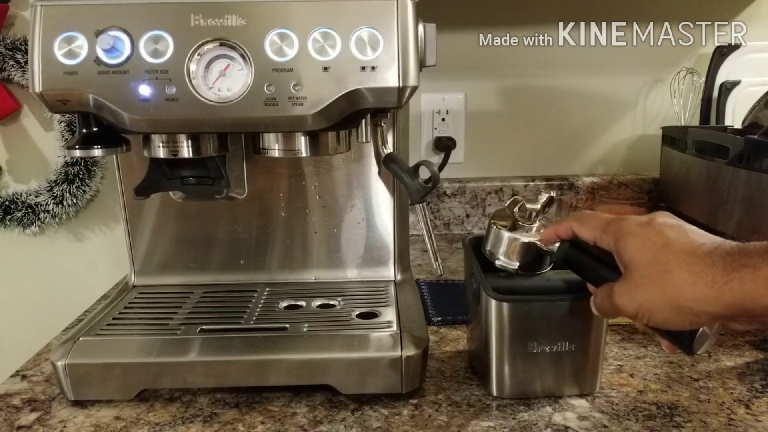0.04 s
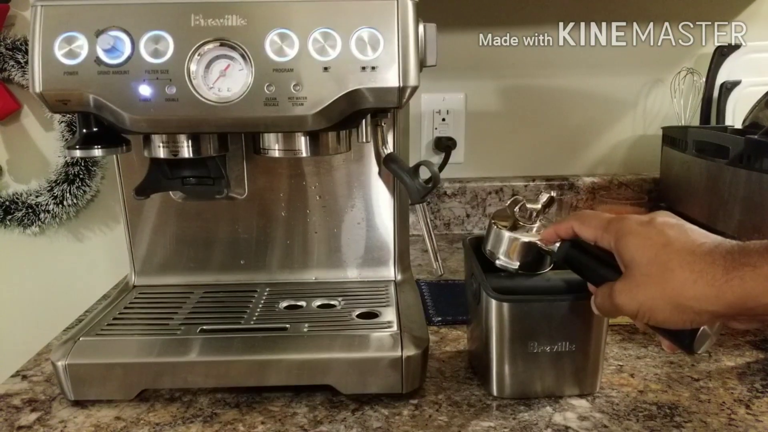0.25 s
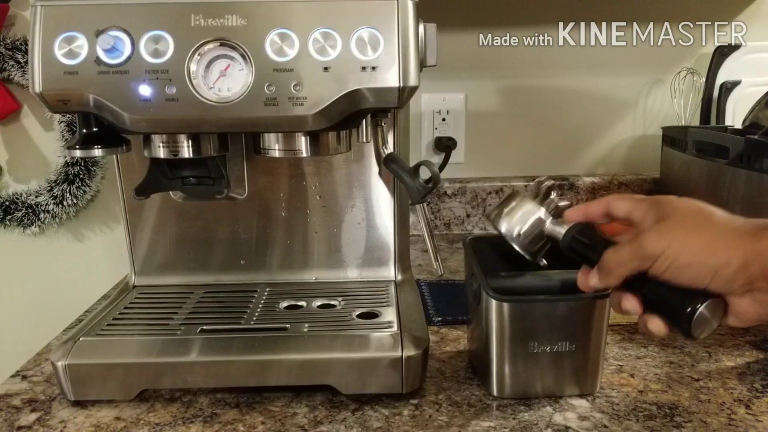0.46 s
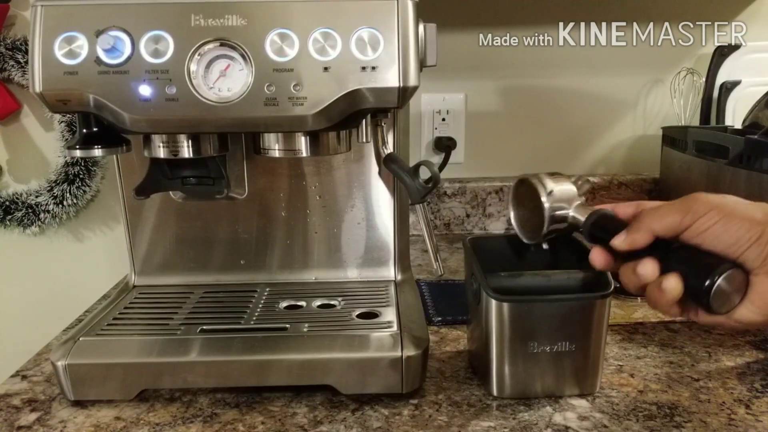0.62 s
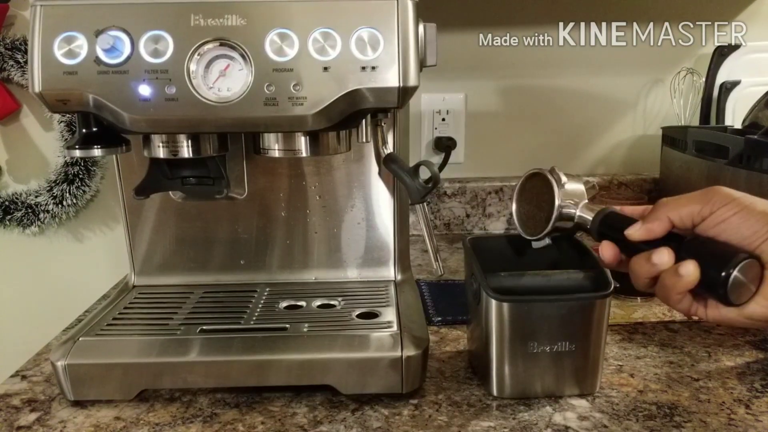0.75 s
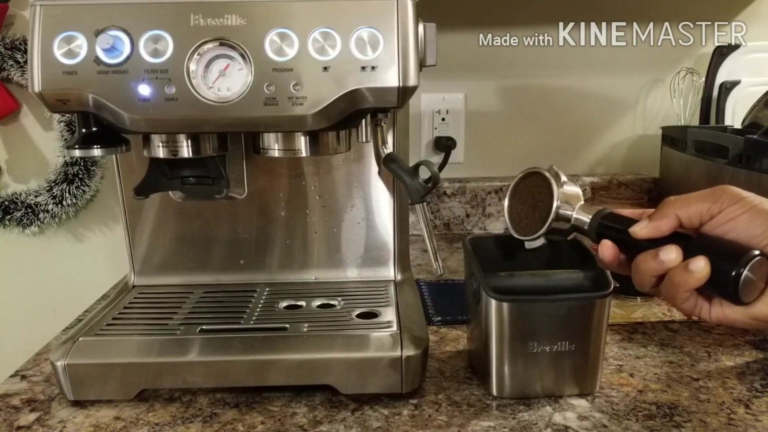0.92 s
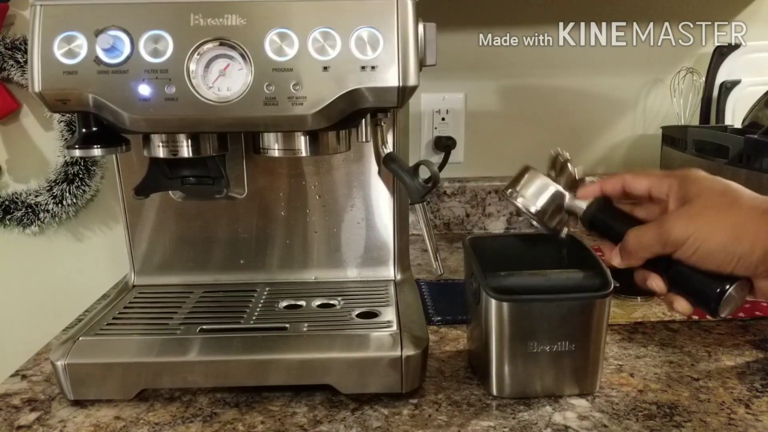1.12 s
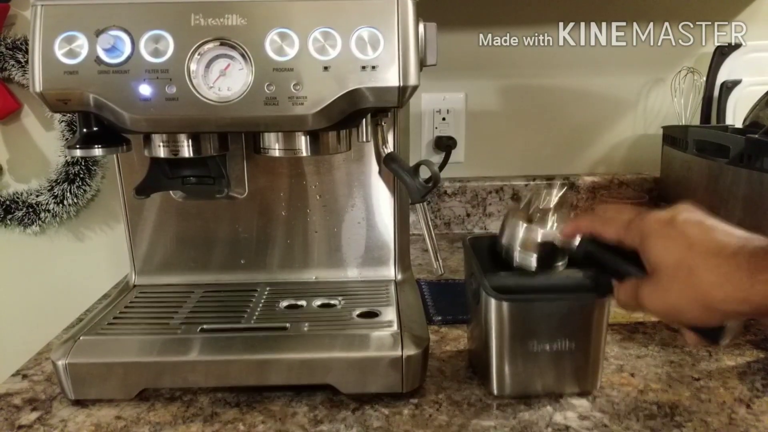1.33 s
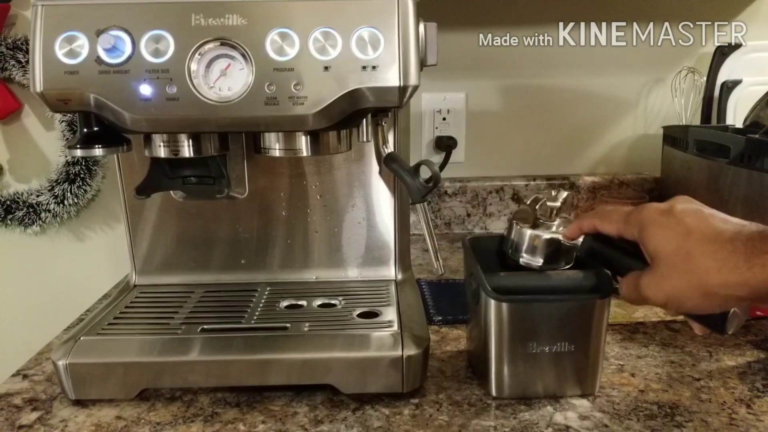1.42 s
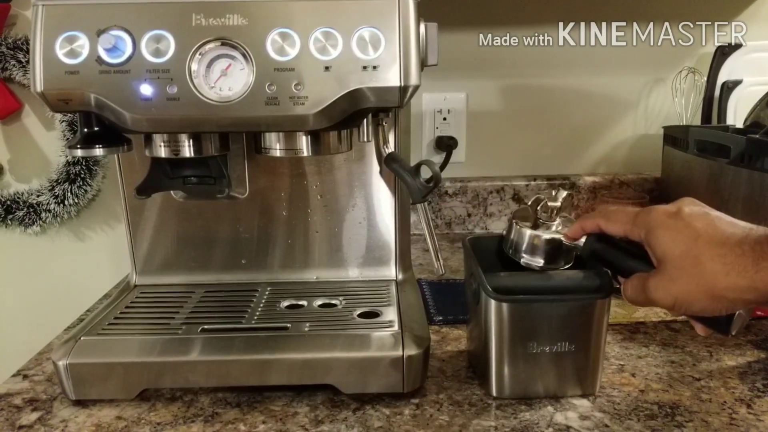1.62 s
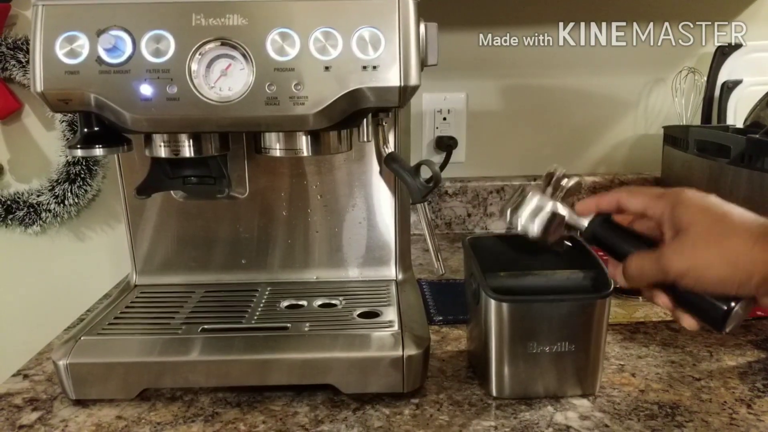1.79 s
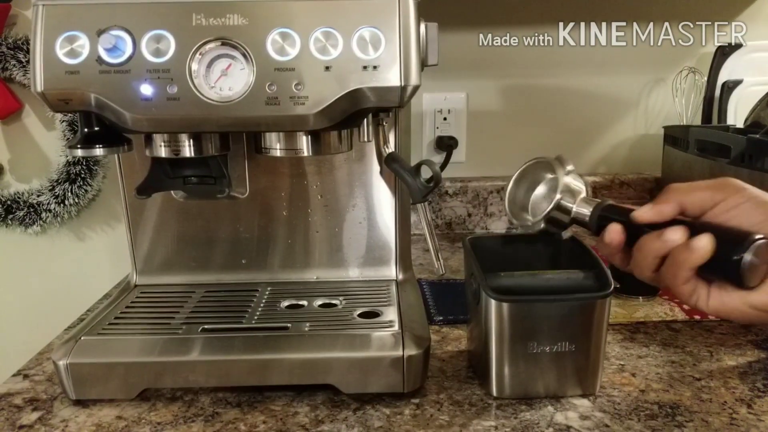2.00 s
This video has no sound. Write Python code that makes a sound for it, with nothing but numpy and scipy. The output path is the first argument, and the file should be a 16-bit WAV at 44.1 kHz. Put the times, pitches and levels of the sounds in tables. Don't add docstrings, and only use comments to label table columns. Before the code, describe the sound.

Coffee filter holder banged hard against a knock box's rubber bar: a low boxy thump with brief steel ring and short kitchen echo, then light settling bounces over faint mains hum, picked up close.

```python
import sys
import numpy as np
from scipy import signal
from scipy.io import wavfile
from scipy.ndimage import uniform_filter1d, minimum_filter1d

SR = 44100
rng = np.random.default_rng(int(sys.argv[2]) if len(sys.argv) > 2 else 0)


def wrap_up_sound(samples):
    columns = np.atleast_2d(samples).T
    tamed = np.clip(columns, -1, 1)
    steps = np.round(tamed * 32767).astype(np.int16)
    wavfile.write(sys.argv[1], SR, steps)


def volts_from_db(level):
    exponent = np.asarray(level, float) / 20
    return 10 ** exponent


N = 90449


def read(points, hz):
    f, value = np.transpose(points)
    return np.interp(np.log(hz + 1), np.log(f + 1), value)


def evened(x):
    return x / np.sqrt(np.mean(x ** 2) + 1e-20)


def add(mix, s, sound):
    at = round(s * SR)
    sound = sound[max(-at, 0):]
    part = mix[max(at, 0):][:len(sound)]
    part += sound[:len(part)]


def clock(seconds):
    return np.arange(0, seconds, 1 / SR)


def onset(t, rise_s):
    return 1 - np.exp(-t / rise_s)


def ring(modes, t, scatter=0):
    spread_db = -1.5
    hz, db, t60 = np.transpose(modes)[:, :, None]
    more, turn = rng.standard_normal((2, len(modes), 1))
    level = volts_from_db(db + spread_db * scatter * more - 60 * t / t60)
    sines = level * np.sin(2 * np.pi * (hz * t + scatter * turn))
    return sines.sum(0) / np.sqrt(len(modes))


def coloured(t, colour, decays):
    hz, at, z = signal.stft(rng.standard_normal(len(t)), SR, nperseg=512, noverlap=448)
    z = z * volts_from_db(read(colour, hz)[:, None] - 60 * at / read(decays, hz)[:, None])
    tail = signal.istft(z, SR, nperseg=512, noverlap=448)[1][:len(t)]
    return tail / np.sqrt(np.mean(tail[:len(t) // 20] ** 2))


def steady(shape):
    a, b = rng.standard_normal((2, len(shape), N // 512 + 5))
    return evened(signal.istft((a + 1j * b) * shape[:, None], nperseg=2048, noverlap=1536)[1][:N])


# f/Hz, level/dB
AIR_COLOUR = [(28, -13.5), (50, 1.5), (200, -7), (600, -15), (1200, -26.5), (2200, -41.5), (10000, -38.5),
              (15000, -54.5)]
# f/Hz, width/Hz, level/dB
WHINES = [(2798, 200, -90), (3440, 440, -82.5), (7030, 900, -79)]


def air():
    hz = np.fft.rfftfreq(2048, 1 / SR)
    wide = steady(volts_from_db(read(AIR_COLOUR, hz)))
    thin = steady(sum(volts_from_db(db) / np.sqrt(w) * np.exp(-((hz - f) / w) ** 2) for f, w, db in WHINES))
    whine_level = np.sqrt(sum(volts_from_db(db) ** 2 for f, w, db in WHINES))
    return volts_from_db(-53) * wide + whine_level * thin


# multiple of the mains frequency, level/dB
HUM = [(1, -62), (2, -56), (3, -61), (4, -68.5), (5, -60.5), (6, -60), (7, -68.5), (8, -65), (9, -63.5),
       (10, -65), (17, -98), (21, -86), (25, -85)]


def hum():
    mains_hz, waver_db = 60, 2.5
    t, out = np.arange(N) / SR, np.zeros(N)
    for k, db in HUM:
        turn = rng.random(7)
        sways = zip(np.geomspace(.7, 16, 6), turn)
        waver = sum(np.sin(2 * np.pi * (f * t + p)) for f, p in sways) / np.sqrt(3)
        tone = np.sin(2 * np.pi * (round(k) * mains_hz * t + turn[6]))
        out += np.sqrt(2) * volts_from_db(db + waver_db * waver) * tone
    return out


# f/Hz, level/dB
EARLIER_COLOUR = [(25, -8), (90, 0.5), (150, 4.5), (400, -4.5), (1100, -13.5), (2300, -28), (4600, -34.5),
                  (15400, -49)]
# f/Hz, t60/s
EARLIER_DECAY = [(80, 0.45), (400, 0.3), (1100, 0.4), (2300, 0.49), (4200, 0.39), (7000, 0.26),
                 (14000, 0.13)]
# f/Hz, level/dB, t60/s
EARLIER_RING = [(48.16, -21, 0.48), (83.3, -5, .2), (145.9, -10.5, 0.22), (300.7, -26.5, 0.57),
                (635, -24, 0.35), (1150, -37, 0.24), (2060, -39, .4)]


def earlier():
    t = clock(.6)
    echo = volts_from_db(-24.5) * coloured(t, EARLIER_COLOUR, EARLIER_DECAY)
    return -.05, echo + ring(EARLIER_RING, t)


# t/s, bounce level/dB, click level/dB, tick level/dB
TOUCHES = [
    (1.5955, -37.5, -46, -42.5),
    (1.603, -16, -46.5, -44.5),
    (1.8684, -47, -51, -58),
    (1.8746, -25.5, -60, -58),
    (1.8775, -58, -43.5, -65.5),
    (1.8827, -31, -56, -72),
    (1.903, -48, -55.5, -72),
]
# f/Hz, level/dB, t60/s
BOUNCE = [(118.5, -7.5, .4), (136.2, -2.5, 0.22), (154.3, -1, 0.22), (697.6, -18, 0.095), (835, -15, 0.071)]
# f/Hz, level/dB
CLICK = [(300, -10), (900, -14), (1300, 2.5), (1900, -3), (2700, -9.5), (4000, -24), (8000, -26.5),
         (15400, -42)]
# f/Hz, level/dB
TICK = [(200, -21.5), (1000, -7), (2500, -5.5), (5000, -6), (10000, -10.5), (15000, -18.5), (16000, -42)]
# f/Hz, t60/s
KITCHEN = [(80, .6), (250, 0.34), (700, 0.39), (1500, 0.36), (3000, 0.37), (7000, 0.37), (14000, .22)]


def touch(s, bounce_db, click_db, tick_db):
    t = clock(.4)
    rock = ring(BOUNCE, t) * onset(t, 0.0011)
    room_db = -15
    click = coloured(t, CLICK, KITCHEN) * (np.exp(-t / 0.0042) + volts_from_db(room_db))
    tick = coloured(t, TICK, KITCHEN) * np.exp(-t / 0.0035)
    contact = (volts_from_db(click_db) * click + volts_from_db(tick_db) * tick) * onset(t, 0.00055)
    return s, volts_from_db(bounce_db) * rock + contact


# f/Hz, level/dB, t60/s
LANDING = [(199.3, 2.5, 0.16), (626, -6.5, 0.17), (824, -14, 0.18)]


def landing():
    t = clock(.4)
    return 1.425, volts_from_db(3) * ring(LANDING, t) * onset(t, 0.015)


# f/Hz, level/dB, t60/s
BAR = [(349.6, 1, 0.16), (546.5, -5, 0.19), (648, -0.5, 0.24), (866, -7.5, 0.13), (1224, -10, 0.053),
       (2690, -19, 0.0083), (4435, -14, .015)]


def bar():
    t = clock(.4)
    return KNOCKS[0][0], volts_from_db(8.5) * ring(BAR, t) * onset(t, 0.00044)


# t/s, then thump, box, echo field and tick, each level/dB
KNOCKS = [
    (1.3864, 1, 2.5, 6, 0.5),
    (1.409, 1.5, -3.5, 4.5, -6.5),
    (1.428, -2, 4, 3, -18.5),
]
# f/Hz, level/dB, t60/s
THUMP = [(101.7, -12, 0.38), (120.9, -14.5, 0.44), (136.3, 3.5, 0.25), (166.45, -4, 0.37), (207, -7, 0.24)]
# f/Hz, level/dB, t60/s
BOX = [(242, -3, 0.083), (302, -8, .35), (332.9, 1, 0.45), (382.6, -4, .24), (437.6, -11, 0.49),
       (497.4, -7, 0.34), (547, -0.5, 0.15), (616.5, -5.5, 0.19), (643, 7, 0.16), (677, -24.5, 0.22),
       (770, -15, 0.12), (924, -15.5, .15), (1046, -19.5, 0.14)]
# f/Hz, level/dB, t60/s
STEEL = [(1520, -3.5, 0.045), (2667, -4, 0.076), (3036, -9, 0.13), (4380, -1.5, 0.01), (8650, -14, 0.045),
         (10450, -17.5, .22), (10600, -17.5, 0.36), (12300, -21.5, .05)]
# f/Hz, level/dB
FIELD = [(62, -35.5), (150, -1), (650, -5), (1000, -15.5), (4400, -34), (5600, -39), (11000, -43.5),
         (15400, -59)]


def knock(s, thump_db, box_db, field_db, tick_db):
    t = clock(.8)
    thump = ring(THUMP, t) * onset(t, 0.0034)
    box = ring(BOX, t, scatter=0.97) * onset(t, 0.003)
    field = volts_from_db(-9.5) * coloured(t, FIELD, KITCHEN) * onset(t, 0.0024)
    tick = volts_from_db(-19.5) * coloured(t, TICK, KITCHEN) * np.exp(-t / .0015)
    steel = volts_from_db(-13.5) * ring(STEEL, t, scatter=1)
    tick = (tick + steel) * onset(t, 0.00018)
    body = volts_from_db(thump_db) * thump + volts_from_db(box_db) * box
    return s, body + volts_from_db(field_db) * field + volts_from_db(tick_db) * tick


def scene():
    mix = air() + hum()
    add(mix, *earlier())
    for row in TOUCHES:
        add(mix, *touch(*row))
    add(mix, *landing())
    add(mix, *bar())
    for row in KNOCKS:
        add(mix, *knock(*row))
    return mix[None]


def held(over_db, db_per_s):
    fall = np.arange(N) * db_per_s / SR
    return np.maximum(np.maximum.accumulate(over_db + fall) - fall, 0)


def gain_control(x):
    from_db, share, rise_s, recover_db_per_s = -26.5, 0.29, 0.097, 2.5
    rise = round(rise_s * SR)
    power_db = 10 * np.log10(abs(uniform_filter1d(x ** 2, size=1000)) + 1e-12)
    duck_db = share * held(power_db - from_db, recover_db_per_s / share)
    return x / volts_from_db(uniform_filter1d(duck_db, rise, origin=rise // 2 - 1))


def limiter(x):
    ceiling, hold_s, release_db_per_s = .99, .003, 400
    hold = round(hold_s * SR)
    peak = -minimum_filter1d(-abs(x), hold)
    over_db = 20 * np.log10(peak / ceiling + 1e-9)
    cut_db = uniform_filter1d(held(over_db, release_db_per_s), hold // 2)
    return np.clip(x / volts_from_db(cut_db), -1, 1)


def roll_off(x):
    return signal.sosfilt(signal.butter(12, 15520, fs=SR, output="sos"), x)


def record(dry):
    mix = limiter(gain_control(dry[0]))
    return roll_off(mix[None])


dry = scene()
out = record(dry)
wrap_up_sound(out)
```